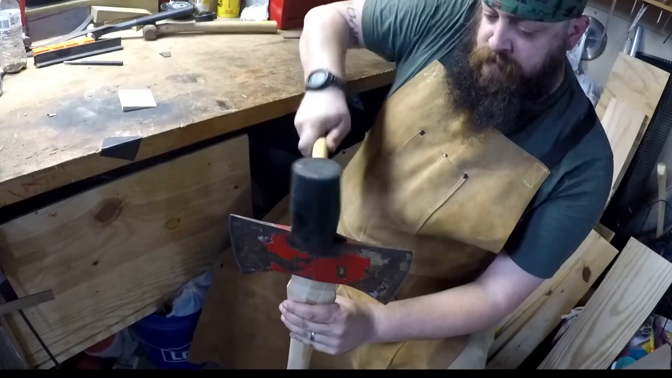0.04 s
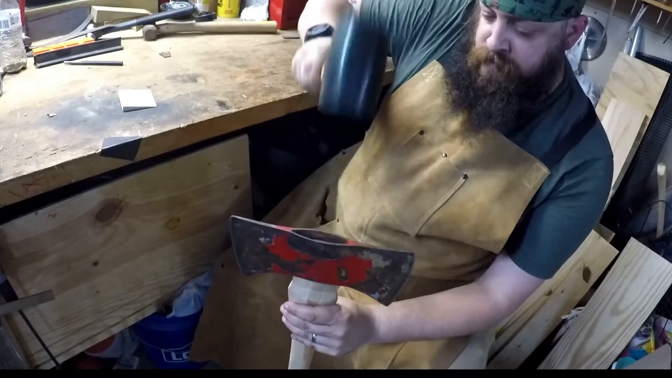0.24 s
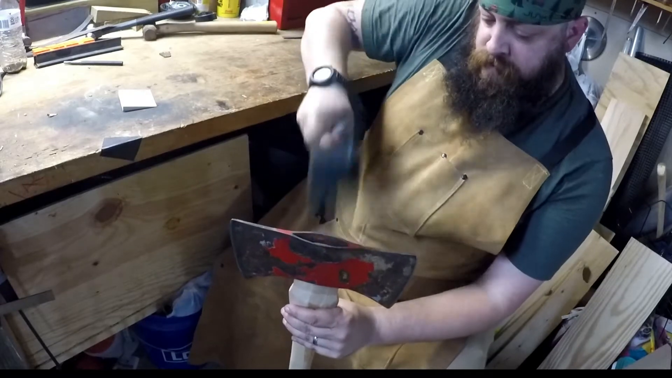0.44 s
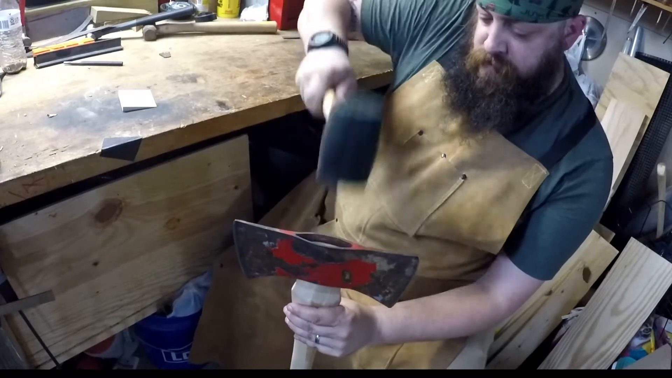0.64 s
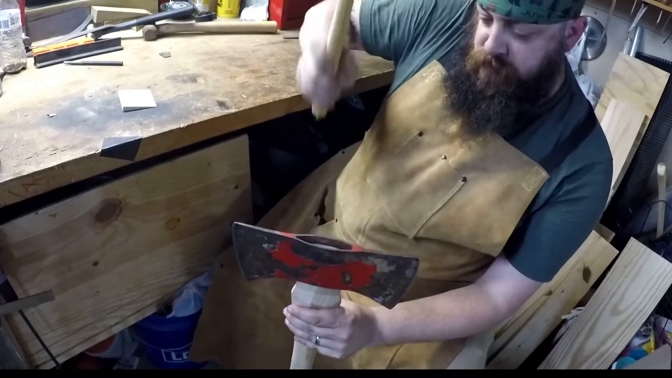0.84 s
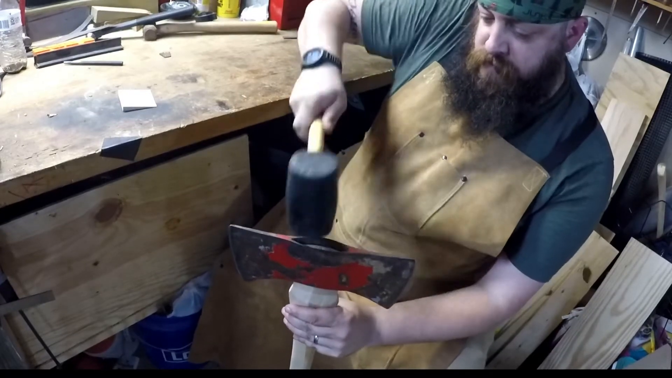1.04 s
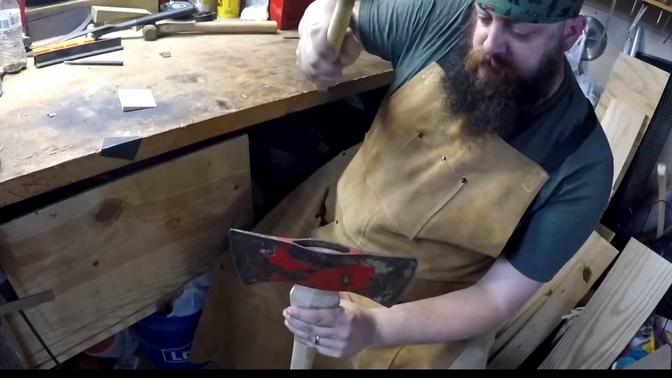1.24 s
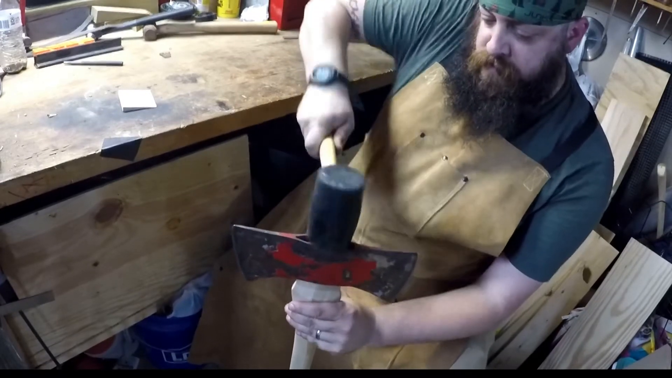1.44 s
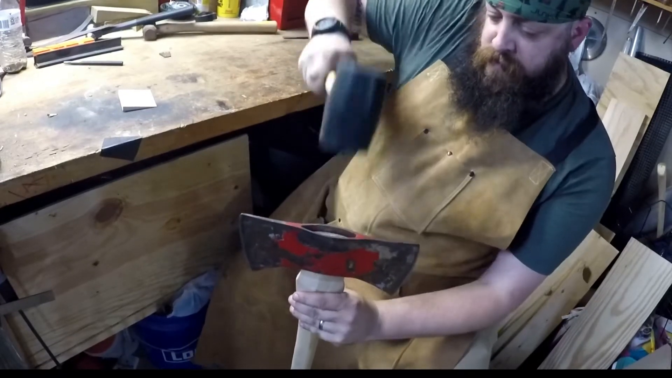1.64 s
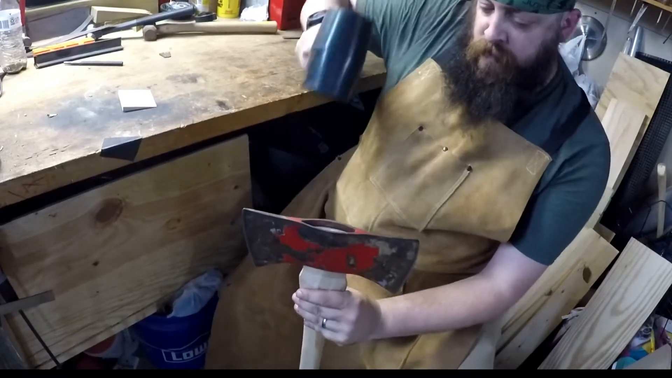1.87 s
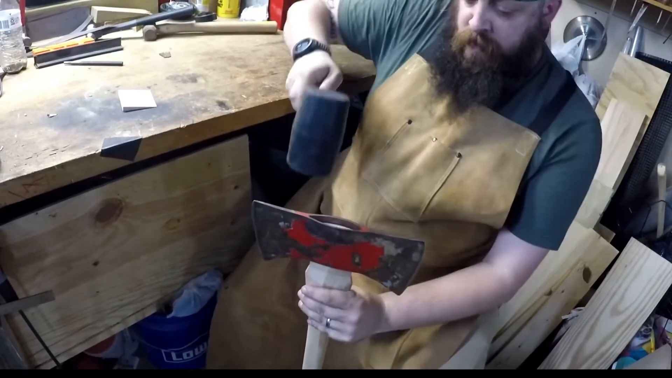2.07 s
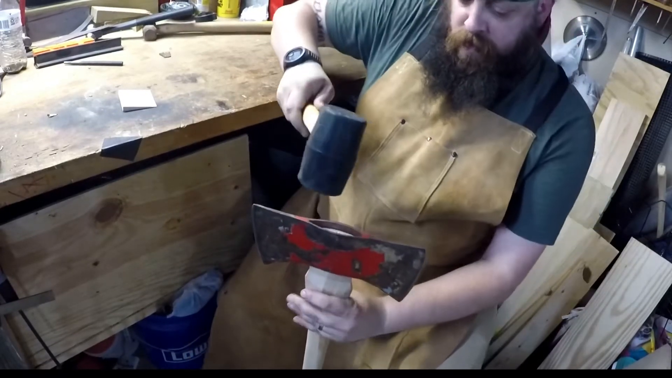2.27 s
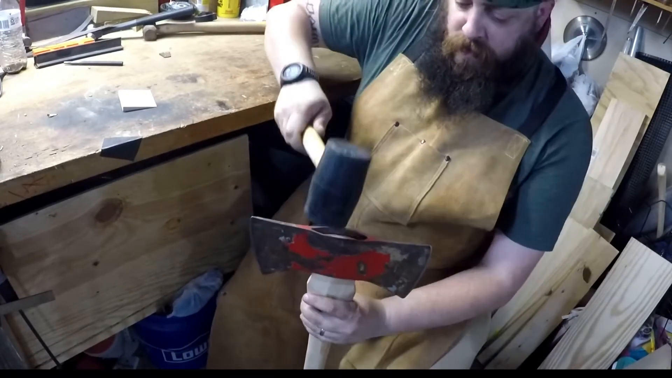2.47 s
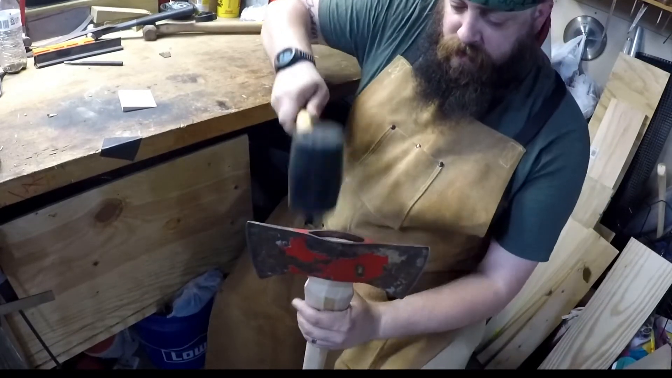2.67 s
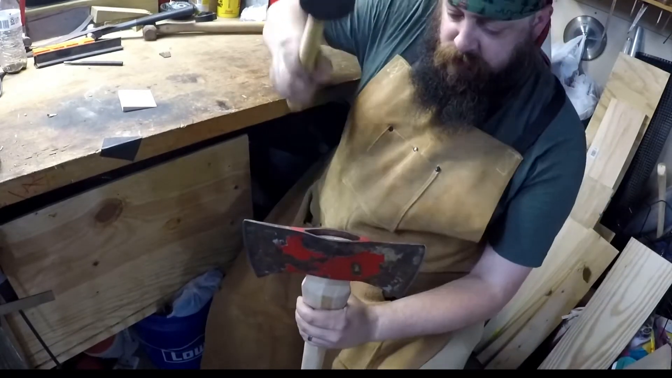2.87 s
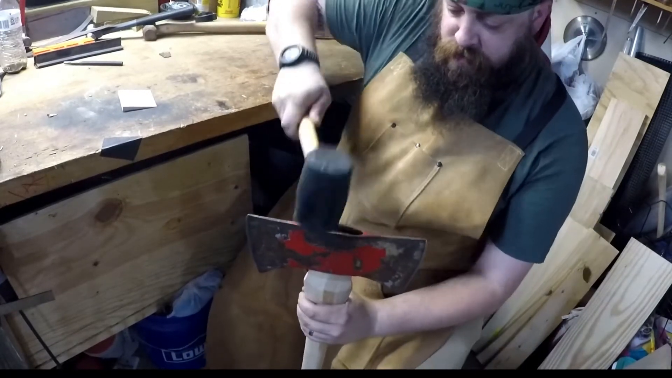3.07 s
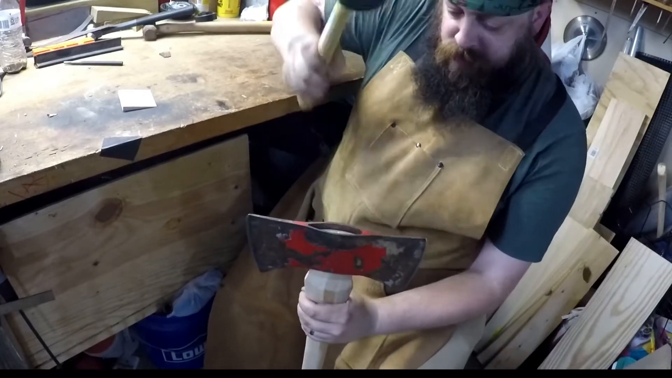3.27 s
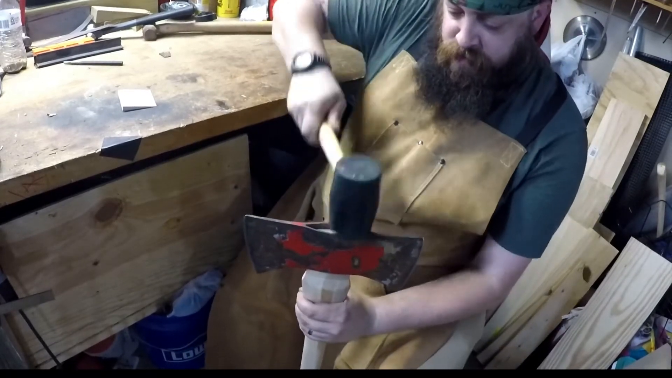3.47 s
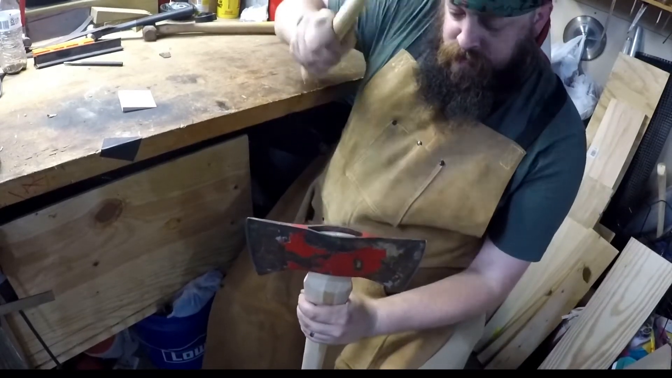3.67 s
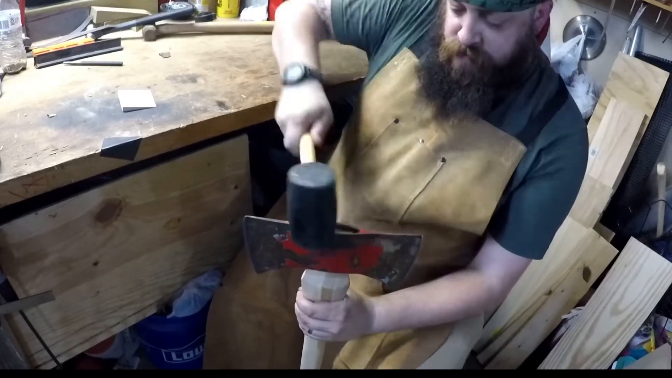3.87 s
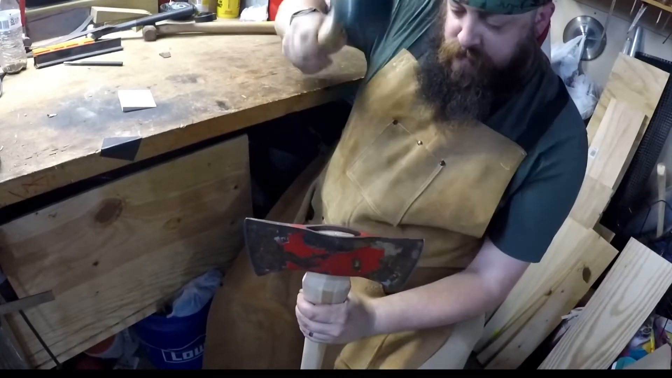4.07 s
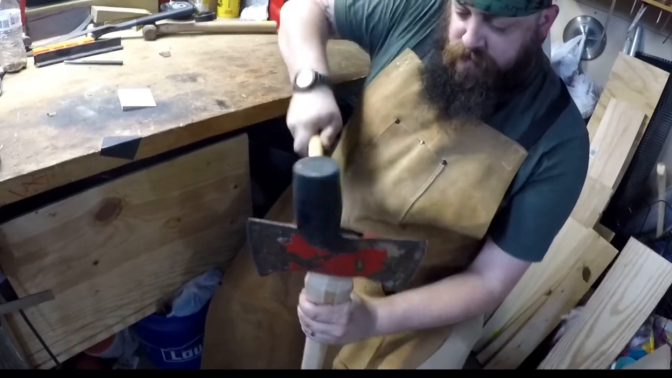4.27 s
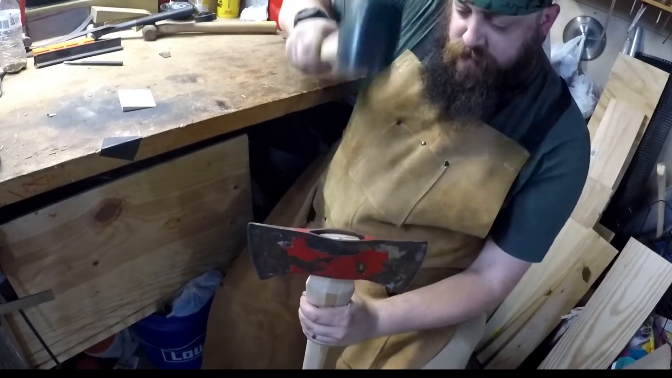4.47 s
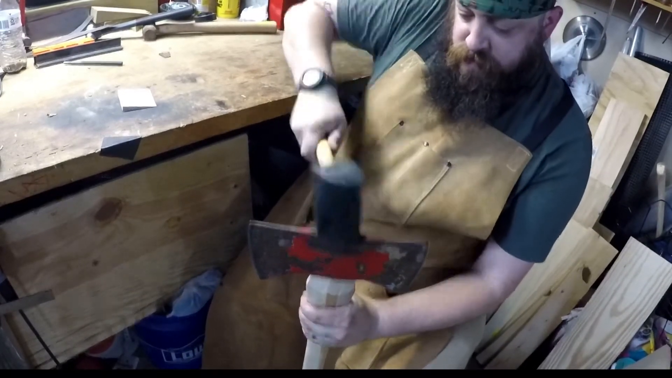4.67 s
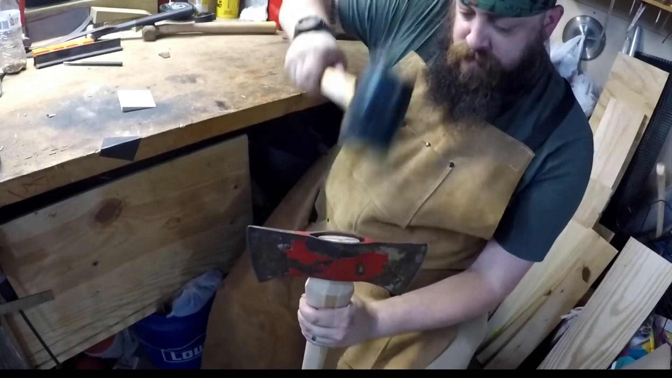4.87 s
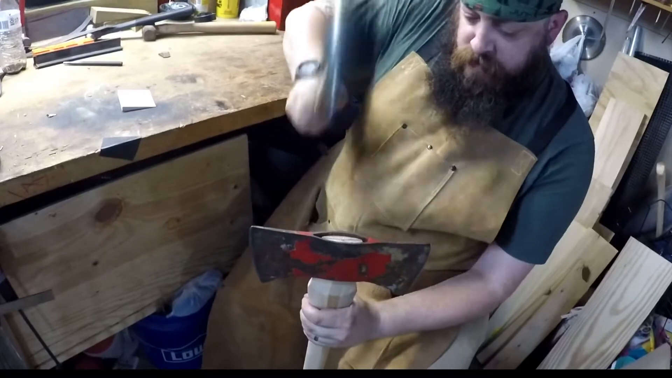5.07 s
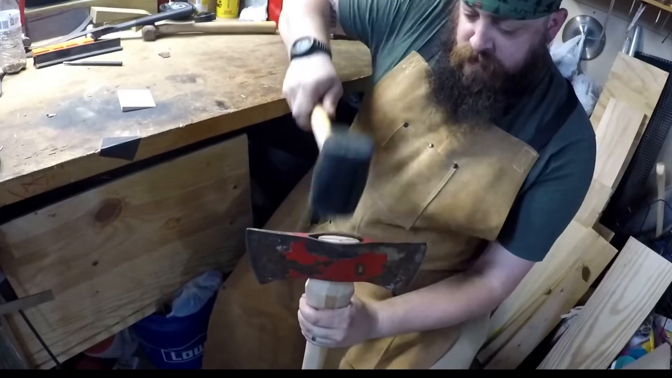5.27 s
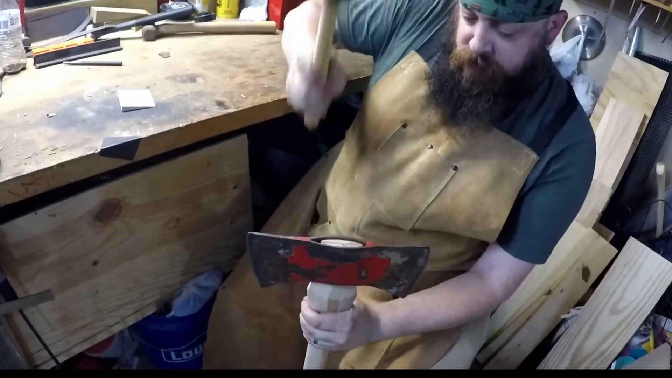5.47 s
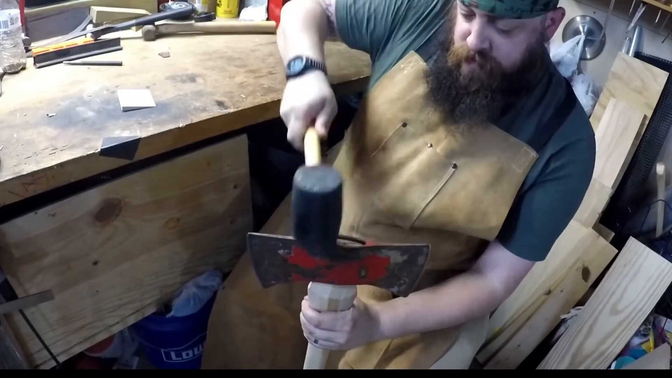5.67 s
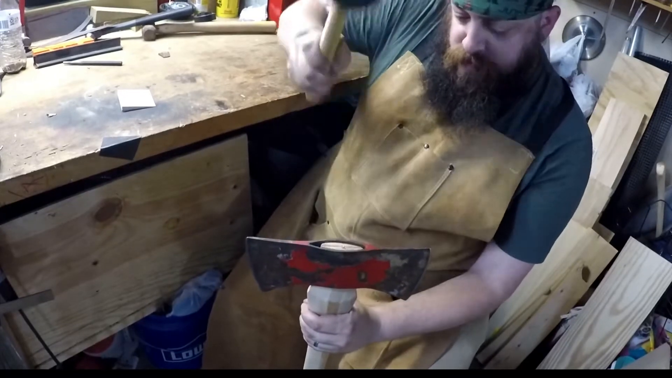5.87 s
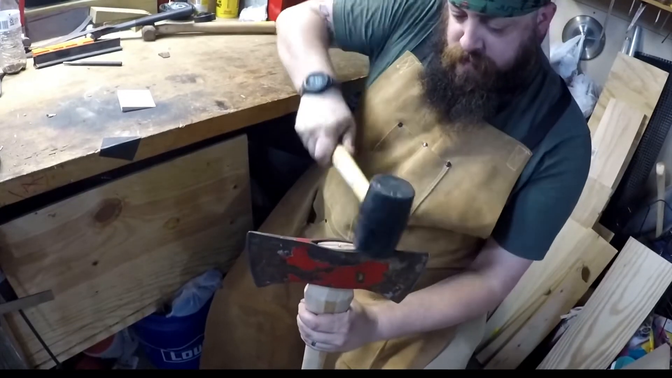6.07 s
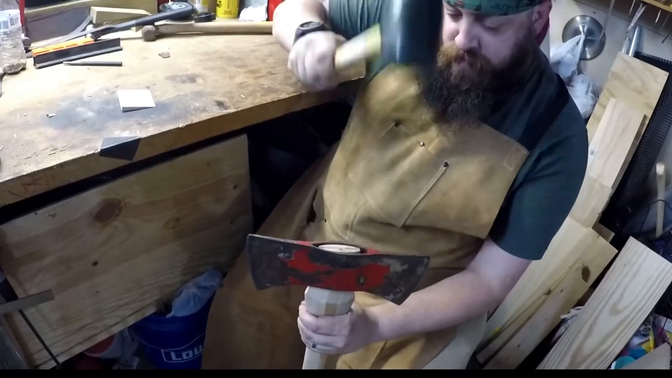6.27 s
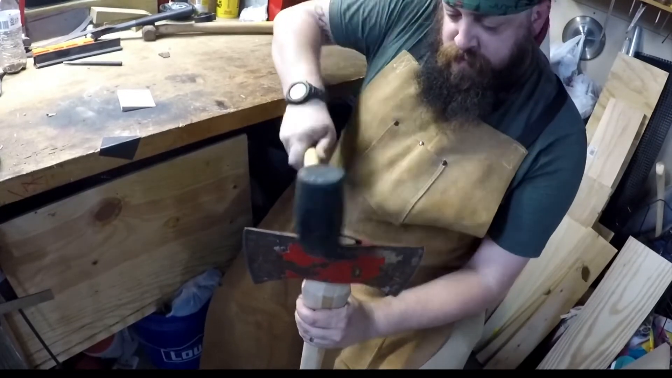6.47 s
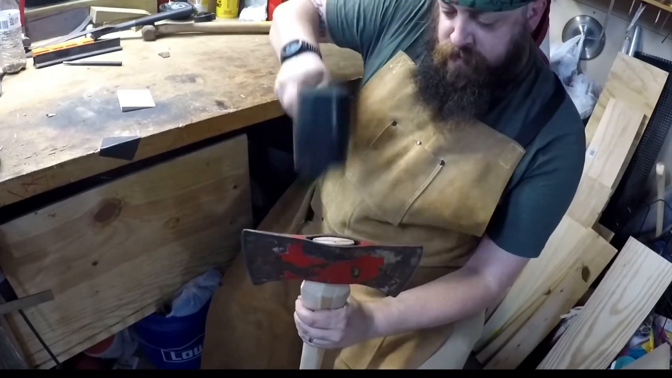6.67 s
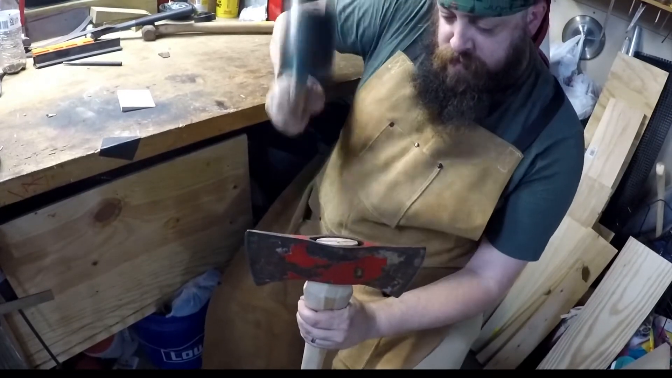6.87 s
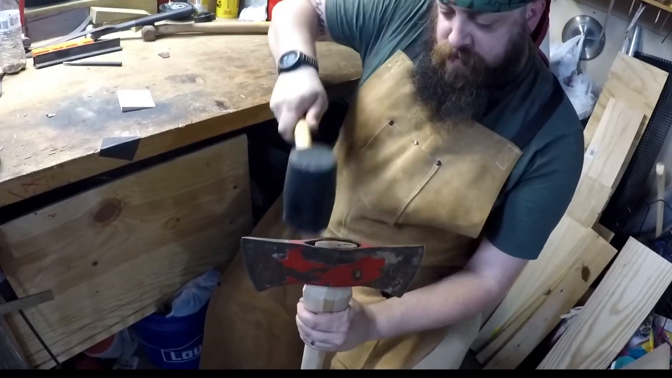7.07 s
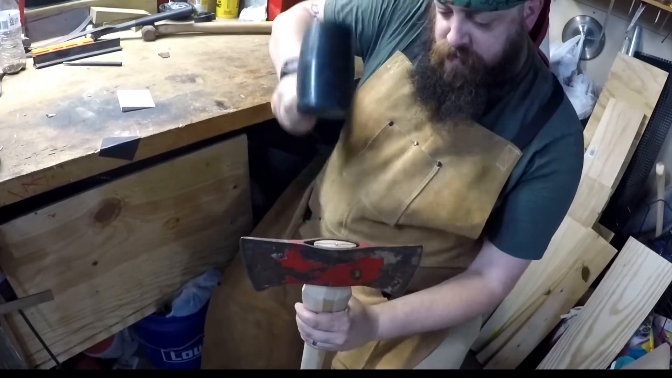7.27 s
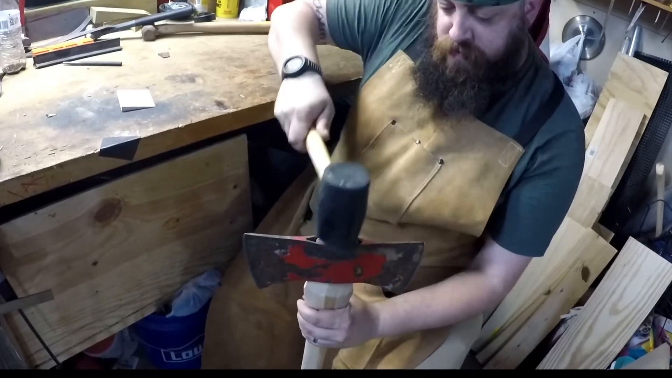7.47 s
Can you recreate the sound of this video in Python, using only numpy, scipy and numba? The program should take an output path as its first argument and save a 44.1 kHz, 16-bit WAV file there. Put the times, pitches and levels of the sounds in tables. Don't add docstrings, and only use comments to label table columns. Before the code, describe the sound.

A rubber mallet pounds an axe head onto its wooden handle in hard, even blows, two a second, in a small close workshop.

```python
import sys
import numpy as np
from scipy import signal
from scipy.fft import rfft, irfft
from scipy.io import wavfile
from scipy.ndimage import uniform_filter1d
from numba import njit

SR = 44100
rng = np.random.default_rng(int(sys.argv[2]) if len(sys.argv) > 2 else 0)


def invert_db(x):
    u = np.asarray(x, float) / 20
    return 10 ** u


def output_pcm(signal):
    pcm = np.clip(np.atleast_2d(signal).T, -1, 1) * 32767
    wavfile.write(sys.argv[1], SR, np.round(pcm).astype(np.int16))


N = 331584
TAIL = int(0.9 * SR)
LEAD = int(0.04 * SR)


def level(x, db=0):
    return x * invert_db(db) / np.sqrt(np.mean(x ** 2))


def on_log(hz, table):
    f, v = np.transpose(table)
    return np.interp(np.log(np.maximum(hz, 1)), np.log(f), v)


def band(x, lo_hz, hi_hz, table=((1, 0), (2, 0))):
    hz = np.arange(len(x) // 2 + 1) * SR / len(x) + 0.0012
    edges = 1 / np.sqrt((1 + (lo_hz / hz) ** 8) * (1 + (hz / hi_hz) ** 8))
    return irfft(rfft(x) * edges * invert_db(on_log(hz, table)), len(x))


def add(track, sound, s):
    i = int((s + 1) * SR)
    track[i:i + len(sound)] += sound


def mallet():
    # time in seconds, strength in dB, hardness in dB (how flat the face lands), handle ring in dB.
    blows = [(0.355, -0.5, 4, 1.5), (0.822, 0, 8, 2.5), (1.2992, 1, 1.5, 0.5), (2.8615, -2, -2.5, 4.5),
             (3.277, -0.5, 3, 0), (3.7047, 0, -1.5, 0.5), (4.1435, .5, 3.5, .5), (4.5722, -0.5, 2.5, 0.5),
             (5.012, 0.5, 0, 1), (5.4535, .5, -8.5, -1), (5.898, -1, 0.5, 0), (6.348, 0.5, -1, -1.5),
             (6.8046, -1, 0.5, -1), (7.2328, -.5, -9.5, -2)]
    # frequency in Hz, level in dB, t60 in seconds.
    thump_modes = [(98, -5, 0.29), (110.9, -5.5, 0.21), (132.66, -3.5, 0.37), (157.16, 2, 0.33),
                   (185.14, 2.5, 0.29), (221.76, -0.5, 0.31), (247, -4, 0.25), (281.9, -6.5, 0.16)]
    # frequency in Hz, level in dB, t60 in seconds.
    deep_modes = [(34.4, -2, 0.79), (53.35, -6, 0.72), (69.15, -6, 0.88), (75.5, 8, 0.41), (81, -9.5, 0.99)]
    # frequency in Hz, level in dB, t60 in seconds.
    handle_modes = [(299.7, -7, 0.29), (327.8, 4.5, 0.19), (365, -4, 0.189), (403, 0.5, 0.16),
                    (495.7, -4.5, 0.17), (566.6, -7, 0.15), (628.7, -9, 0.16), (749, -15.5, 0.16)]
    # frequency in Hz, level in dB, t60 in seconds.
    steel_modes = [(930, -13, 0.35), (1133, -8.5, .2), (1242, -5, 0.18), (1460, 0.5, 0.11),
                   (1584, -14, .28), (1882, -11.5, 0.28), (5150, -29.5, 0.27), (8750, -30.5, .25),
                   (12882, -35.5, .3)]
    earlier_blow = (-0.11, -5, -33, -11)
    sizzle_hz = 10500

    track = np.zeros(N + 3 * SR)
    room = rng.standard_normal(TAIL // 2)
    for s, force_db, hard_db, handle_db in [earlier_blow, *blows]:
        s += 0.002
        mid_db = force_db + 0.056 * hard_db
        treble_db = force_db + 0.32 * hard_db
        noise = room + 0.78 * rng.standard_normal(TAIL // 2)

        thump = ring(thump_modes, detune=0.0076, scatter_db=1.65, rise_s=0.0042, focus_s=0.002)
        add(track, -invert_db(force_db - 7) * thump, s + 0.0025)
        add(track, invert_db(force_db - 17) * thump[:900] * np.hanning(900), s - 0.015)
        deep = ring(deep_modes, detune=0.0036, scatter_db=1.0, rise_s=0.011)
        add(track, invert_db(force_db - 17.5) * deep, s)

        low_tail = reverberation(noise, 250, 580, 0.0042, patchy_db=2.0)
        add(track, invert_db(handle_db - 19.5) * low_tail, s)
        knock = ring(handle_modes, detune=0.011, scatter_db=3.0, rise_s=0.0042)
        add(track, invert_db(handle_db - 14.5) * knock, s + 0.0023)

        mid_tail = reverberation(noise, 603, 2400, 0.0013, patchy_db=0.5)
        add(track, invert_db(mid_db - 24.5) * mid_tail, s)
        treble_tail = reverberation(noise, 2440, sizzle_hz, 0.0013, patchy_db=0.3)
        add(track, invert_db(treble_db - 33.5) * treble_tail, s)
        sizzle = reverberation(noise, sizzle_hz, 15500, 0.03, patchy_db=1.0)
        add(track, invert_db(treble_db - 65) * sizzle, s)

        steel = ring(steel_modes, detune=0.00067, scatter_db=4.5, rise_s=0.0026)
        add(track, invert_db(mid_db - 26.5) * steel, s)
        add(track, invert_db(hard_db + 10) * slap(hard_db), s - LEAD / SR)
    return track[SR:SR + N]


def slap(hard_db):
    # frequency in Hz, level in dB per Hz.
    slap_spectrum = [(300, 15), (1000, -1.5), (2000, -3.5), (3000, -1), (4800, -6), (6000, -17.5),
                     (9000, -23.5), (11000, -45), (13500, -36.5), (15000, -37)]
    # delay in seconds, level in dB.
    echoes = [(.0012, -13.5), (.0028, -8.5), (.007, -7), (0.0119, -14.5), (0.015, -10)]
    # frequency in Hz, level in dB, t60 in seconds.
    face_modes = [(1500, -24, .008), (2900, -22, .007), (3600, -26, .006), (4400, -22, .007),
                  (5000, -25, .006)]
    smear_hz = (1500, 2900, 4300, 4900, 6600, 8700)
    smear_db = (-42.5, -50, -36, -41.5, -26.5, -30)

    t = (np.arange(2 * LEAD + TAIL // 8) - LEAD) / SR

    def crackle():
        grit = 0.12 * rng.standard_normal(len(t)) * (t >= 0) * np.exp(-np.abs(t) / 0.001)
        return grit - (t == 0)

    out = crackle()
    face = ring(face_modes, detune=0.06, scatter_db=3, rise_s=0.0001)
    out[LEAD:] += 0.7 * face[:len(t) - LEAD]
    for delay_s, db in echoes:
        out = out + invert_db(db + 2 * rng.standard_normal()) * np.roll(crackle(), int(delay_s * SR))

    before = rfft(rng.standard_normal(len(t)) * (t < 0) * np.exp(-(t / 0.015) ** 2))
    hz = np.arange(len(t) // 2 + 1) * SR / len(t)
    smear = 0
    for f, db in zip(smear_hz, smear_db):
        narrow = irfft(before * np.exp(-((hz - f) / 450) ** 4), len(t))
        smear = smear + invert_db(db + 3 * rng.standard_normal()) * narrow
    smear_gain_db = (0.6 - 1) * hard_db
    return band(out + invert_db(smear_gain_db) * smear, 250, 16000, slap_spectrum)


def ring(modes, detune, scatter_db, rise_s, focus_s=0):
    hz, db, t60 = np.transpose(modes)[:, :, None]
    t = np.arange(TAIL) / SR
    jitter = rng.standard_normal((2, len(modes), 1))
    decay = invert_db(db + scatter_db * jitter[0] - 60 * t / t60)
    waves = decay * np.sin(2 * np.pi * hz * (1 + detune * jitter[1]) * (t - focus_s))
    fade = np.cos(np.pi / 2 * np.arange(TAIL) / TAIL)
    return waves.sum(0) * (1 - np.exp(-t / rise_s)) * fade


def reverberation(noise, lo_hz, hi_hz, build_s, patchy_db):
    # frequency in Hz, level in dB per Hz.
    tail_spectrum = [(240, -10), (400, -2), (593, -11.5), (723, -8.5), (907, -11.5), (1500, -20),
                     (1640, -18), (2430, -26), (3770, -33), (5860, -28), (7810, -41.5), (9090, -40.5),
                     (10900, -56), (13300, -45), (15000, -72)]
    # frequency in Hz, t60 in seconds.
    tail_t60 = [(300, 0.14), (740, 0.24), (1940, 0.23), (5120, 0.26), (13500, 0.34)]
    # frequency in Hz, width in Hz, level in dB.
    body = [(1048, 110, 3.5), (1600, 150, 7), (1950, 390, 4), (4600, 1100, 5.5), (5540, 490, -1.5),
            (8760, 600, -1), (12900, 250, 5.5)]
    bend = 1.052

    t = np.arange(len(noise)) / SR
    built = noise * (1 - np.exp(-t / build_s))
    out = 0
    for centre_hz in lo_hz * 2 ** np.arange(0, np.log2(hi_hz / lo_hz) + 1 / 3, 1 / 3):
        fading = built * invert_db(-60 * (t / on_log(centre_hz, tail_t60)) ** bend)
        part = band(fading, centre_hz / 2 ** (1 / 6), centre_hz * 2 ** (1 / 6))
        out = out + invert_db(patchy_db * rng.standard_normal()) * part

    hz = np.arange(len(t) // 2 + 1) * SR / len(t)
    body_db = sum(db / (1 + (2 * (hz - f) / width_hz) ** 2) for f, width_hz, db in body)
    out = irfft(rfft(band(out, lo_hz, hi_hz, tail_spectrum)) * invert_db(body_db), len(t))
    fade = np.cos(np.pi / 2 * t / t[-1])
    return out / np.sqrt(np.mean(out[:LEAD] ** 2)) * fade


def knocks():
    # frequency in Hz, level in dB, t60 in seconds.
    set_down_modes = [(71, -5.5, 0.49), (99.5, 3, 0.32), (126, 6.5, 0.23), (150, -5, 0.61),
                      (183, 5.5, 0.14), (214, -25, 0.22), (254.6, 4.5, 0.168), (286, 0.5, 0.079),
                      (384, -16, .2), (446, -17, 0.245), (520, -10, 0.11), (576, -16, 0.16),
                      (686, -17, 0.15)]
    # start in seconds, frequency in Hz, level in dB, t60 in seconds.
    taps = [
        (.047, 999.5, -46, 0.11),
        (0.527, 1650, -46, .08),
        (1.66, 990, -44, .15),
        (1.665, 1210, -58, 0.23),
        (1.664, 1600, -48.5, 0.52),
        (2.268, 660, -39, 0.13),
        (2.268, 880, -36, 0.08),
        (2.27, 1090, -53, 0.092),
        (7.313, 930, -28, 0.095),
    ]
    track = np.zeros(N + 3 * SR)
    set_down = ring(set_down_modes, detune=0, scatter_db=1.5, rise_s=0.0057)
    add(track, -invert_db(-9) * set_down, 2.4265)
    for s, hz, db, t60 in taps:
        modes = [(hz, db, t60), (0.93 * hz, db - 6, t60 / 2)]
        add(track, ring(modes, detune=0, scatter_db=0, rise_s=0.001), s)
    return track[SR:SR + N]


def hands():
    # peak in seconds, rise in seconds, fall in seconds, mid level in dB, treble level in dB.
    rubs = [(.05, 0.0078, 0.029, -66, -71), (0.527, .0003, 0.0016, -38, -48),
            (.564, .0003, 0.0017, -46, -60), (.578, .0003, .0015, -51, -55),
            (.53, 0.0027, 0.044, -50.5, -60), (1.548, 0.027, 0.027, -65, -54),
            (1.658, 0.0035, 0.085, -45.5, -53.5), (1.995, 0.047, 0.039, -46.5, -44),
            (2.12, 0.023, 0.093, -69, -59.5), (2.271, 0.01, 0.075, -53.5, -56),
            (2.429, 0.0072, 0.048, -41, -50.5)]

    def grain(centre_hz, width_hz):
        grit = invert_db(rng.standard_normal(N // 64 + 1)).repeat(64)[:N]
        noise = rng.standard_normal(N) * grit
        return level(band(noise, centre_hz - width_hz / 2, centre_hz + width_hz / 2))

    t = np.arange(N) / SR
    mid, treble = grain(1300, 1300), grain(4900, 2400)
    out = 0
    for s, rise_s, fall_s, mid_db, treble_db in rubs:
        swell = np.exp(-((t - s) / rise_s) ** 2)
        shape = np.where(t < s, swell, np.exp(-np.abs(t - s) / fall_s))
        out = out + shape * (invert_db(mid_db) * mid + invert_db(treble_db) * treble)
    return out


def background():
    # time in seconds, bustle in dB.
    bustle = [(0, 2.5), (.4, 4.5), (1.0, 2), (1.5, 3.5), (1.9, 5), (2.14, 12), (2.3, 13.5), (2.45, 13.5),
              (2.66, 13), (2.85, 14), (3.02, 2), (3.9, -1.5), (4.2, -0.5), (5.0, -2), (6.1, -2), (6.45, -1),
              (7.52, -2.5)]
    # frequency in Hz, level in dB per Hz.
    room_spectrum = [(12, -30.5), (20, 7), (38, -5), (113, -3), (235, -6.5), (294, -21), (361, -19),
                     (542, -26.5), (736, -26.5), (978, -26), (1130, -29), (2600, -38.5), (3380, -76),
                     (5720, -120)]
    # frequency in Hz, level in dB per Hz.
    hiss_spectrum = [(1410, -39.5), (2400, 1.5), (3360, -6), (3690, -7), (4740, -1.5), (5460, -5),
                     (6800, -5.5), (9750, -2), (13800, -16.5), (15600, -27)]
    rest_db = (-39.5, -54, -58.5, -67)
    follows = (.45, 1.02, 0.64, .45)

    bustle_db = np.interp(np.arange(N) / SR, *np.transpose(bustle))
    bands = [(18, 250, room_spectrum), (250, 550, room_spectrum),
             (550, 2500, room_spectrum), (2500, 15800, hiss_spectrum)]
    layers = []
    for part, db, share in zip(bands, rest_db, follows):
        air = level(band(rng.standard_normal(N), *part))
        layers.append(air * invert_db(db + share * bustle_db))
    hold = int(0.15 * SR)
    swell = uniform_filter1d(np.repeat(rng.standard_normal(200), hold)[:N], size=hold)
    return layers[0] * invert_db(2.5 * swell) + sum(layers[1:])


def scene():
    return (mallet() + knocks() + hands() + background())[None]


@njit
def follow(x, attack, release):
    out, e = np.empty(len(x)), 1e-6
    for i in range(len(x)):
        e += (abs(x[i]) - e) * (attack if abs(x[i]) > e else release)
        out[i] = e
    return out


def sparse_top(x):
    edges_hz, floor_db = (13000, 13700, 14400, 15100, 16000), (-93, -95, -98, -96)
    hz, spectrum = np.arange(N // 2 + 1) * SR / N, rfft(x)
    for lo_hz, hi_hz, db in zip(edges_hz, edges_hz[1:], floor_db):
        part = irfft(spectrum * ((hz >= lo_hz) & (hz < hi_hz)), N)
        faint = uniform_filter1d(part ** 2, size=1024) < invert_db(db) ** 2
        x = x - part * uniform_filter1d(1.0 * faint, size=512)
    return x


def roll_off(x):
    return signal.sosfilt(signal.butter(12, 15920, fs=SR, output="sos"), x)


def record(dry):
    limit_db, limit_ratio, attack_s, release_s = -6, 2.5, 0.0038, 0.046
    loud = follow(dry[0], 1 / (attack_s * SR), 1 / (release_s * SR))
    gain = np.minimum(1, invert_db(limit_db) / loud) ** (1 - 1 / limit_ratio)
    rounded = 0.97 * np.tanh(dry[0] * gain / 0.88)
    top_cut = signal.ellip(10, 0.3, 60, 15400, fs=SR, output="sos")
    mix = sparse_top(signal.sosfilt(top_cut, rounded))
    return roll_off(mix[None])


dry = scene()
out = record(dry)
output_pcm(out)
```